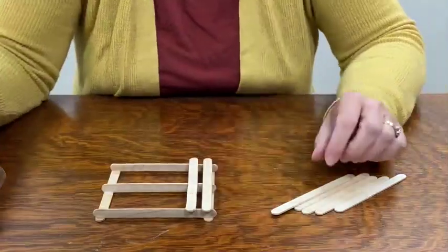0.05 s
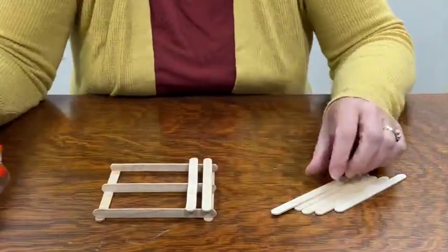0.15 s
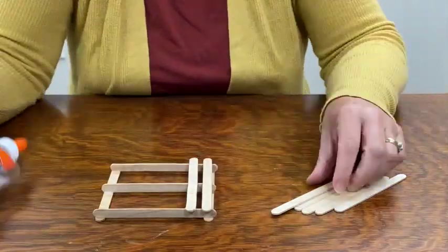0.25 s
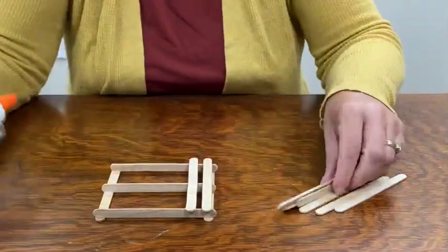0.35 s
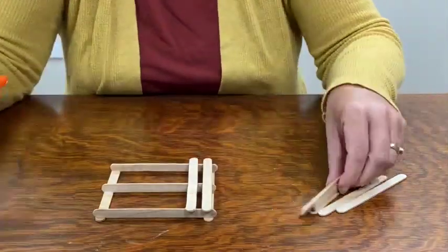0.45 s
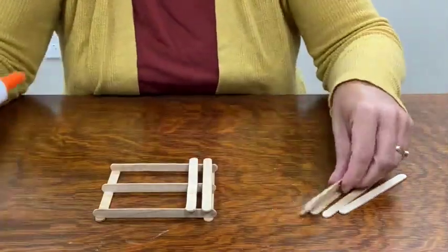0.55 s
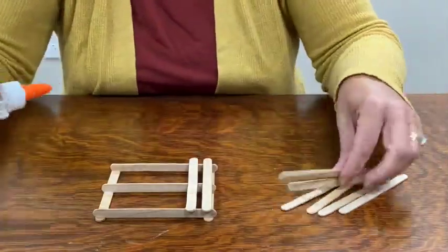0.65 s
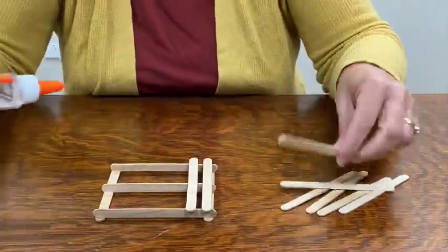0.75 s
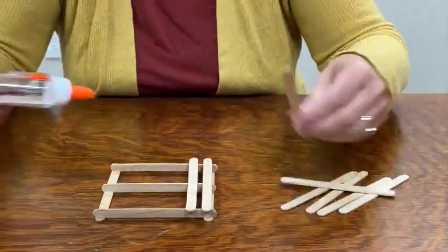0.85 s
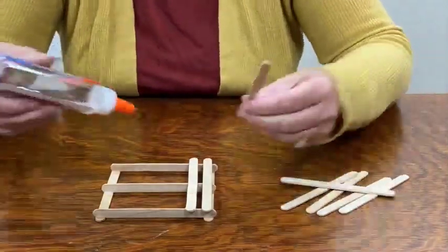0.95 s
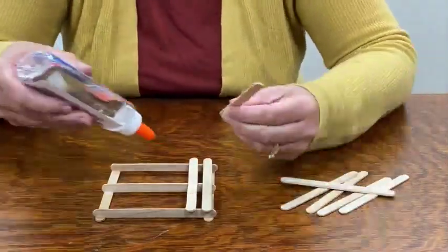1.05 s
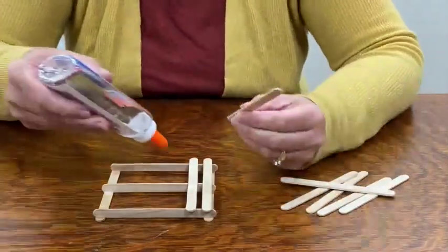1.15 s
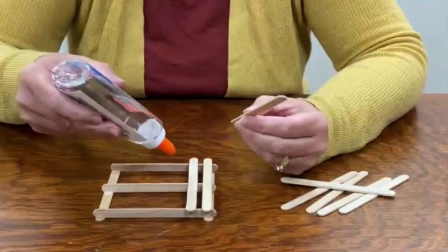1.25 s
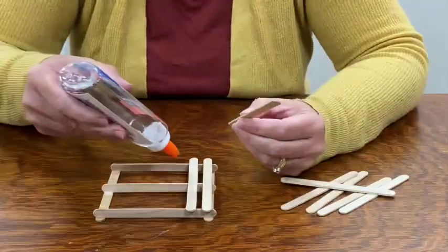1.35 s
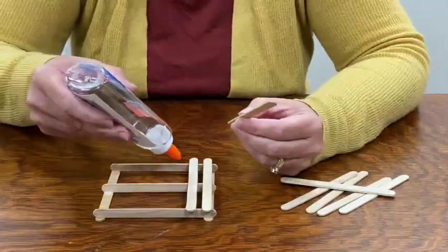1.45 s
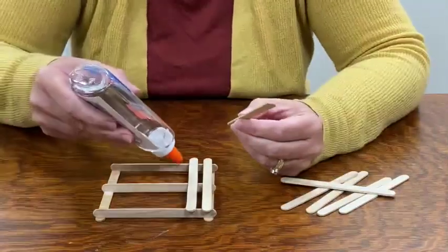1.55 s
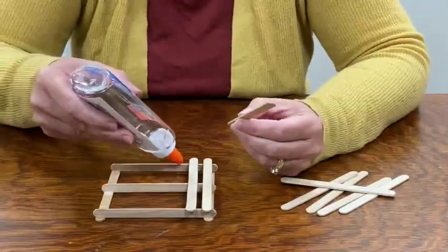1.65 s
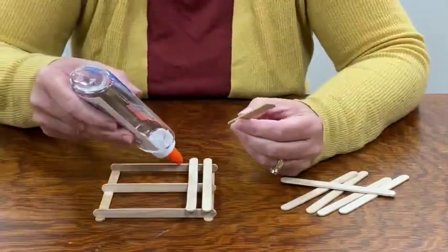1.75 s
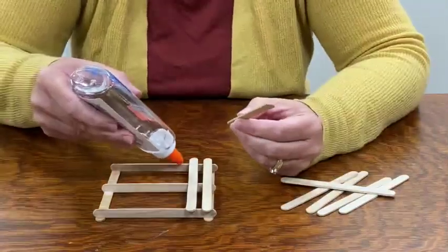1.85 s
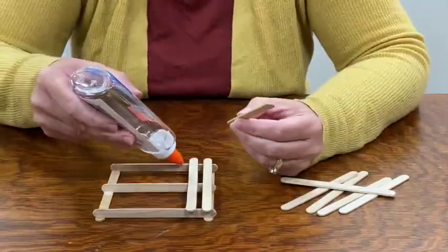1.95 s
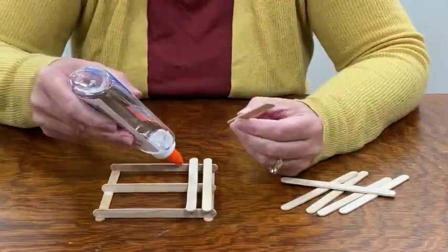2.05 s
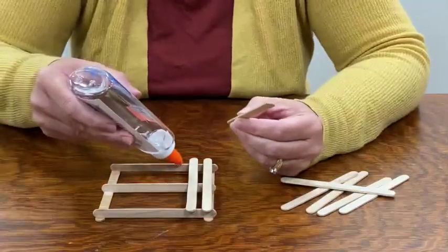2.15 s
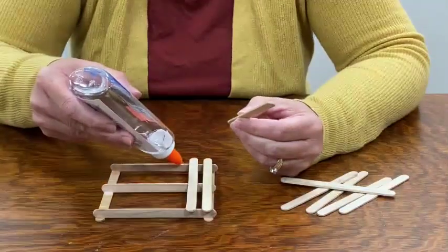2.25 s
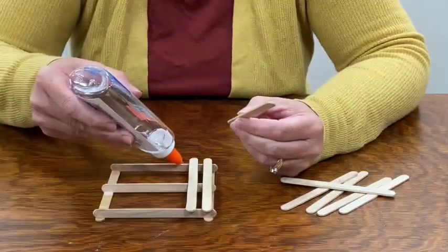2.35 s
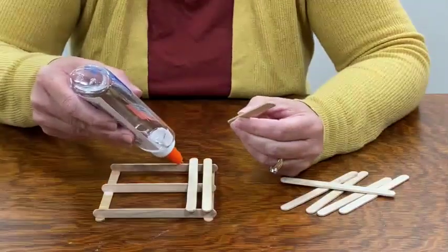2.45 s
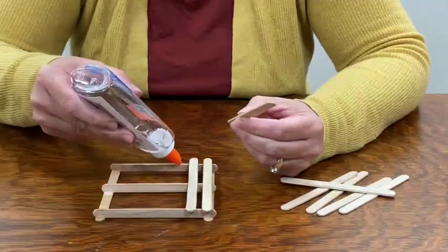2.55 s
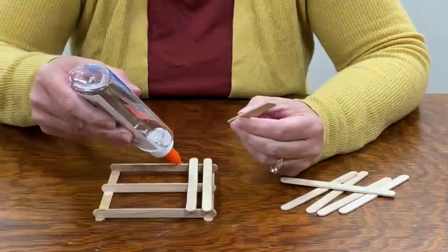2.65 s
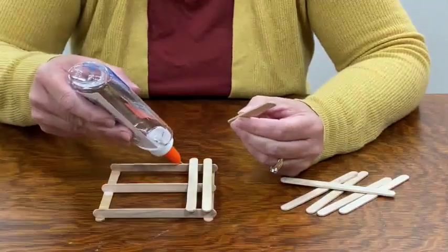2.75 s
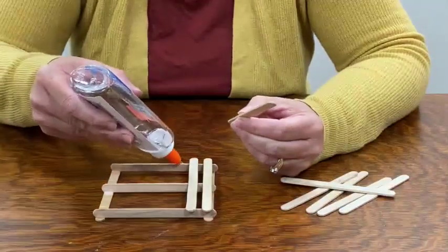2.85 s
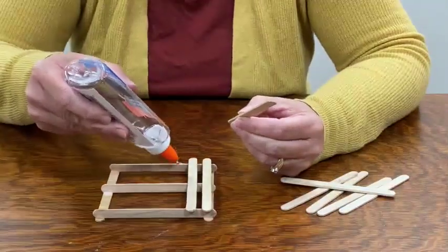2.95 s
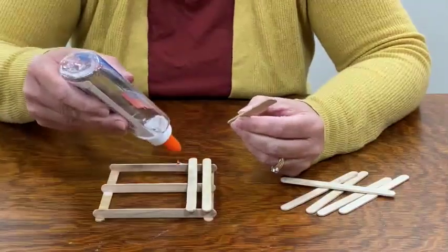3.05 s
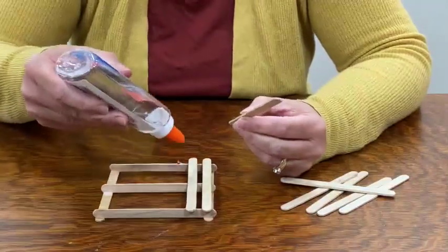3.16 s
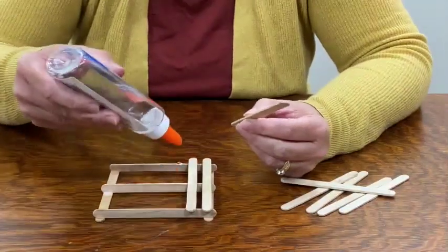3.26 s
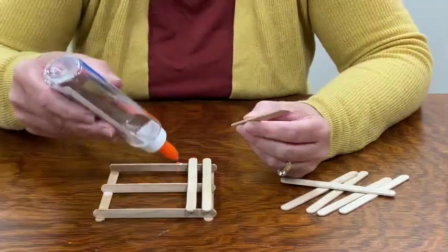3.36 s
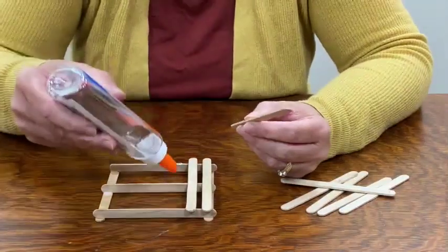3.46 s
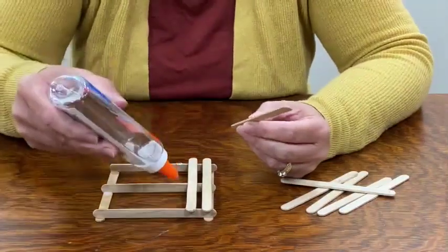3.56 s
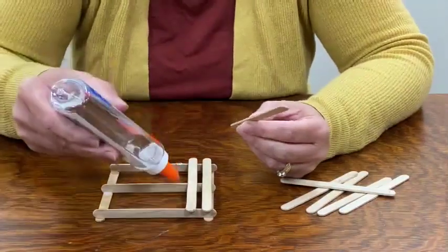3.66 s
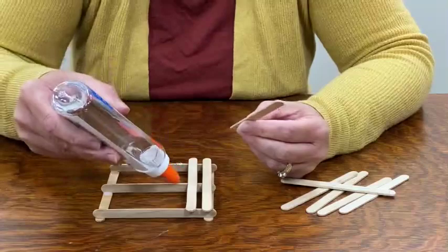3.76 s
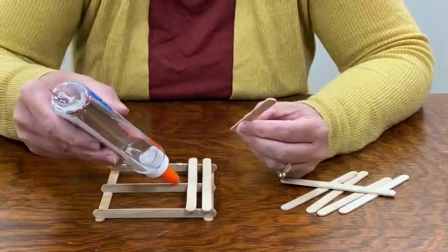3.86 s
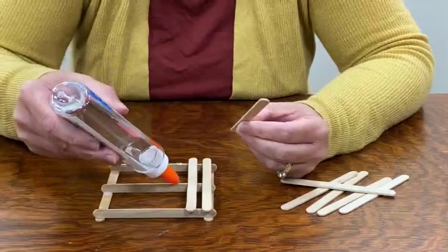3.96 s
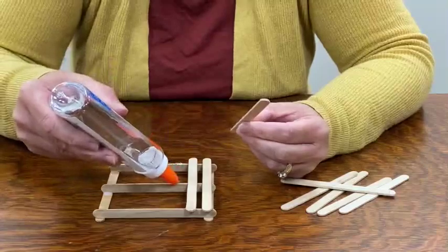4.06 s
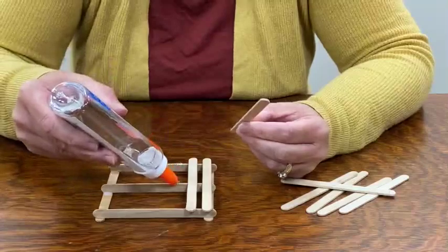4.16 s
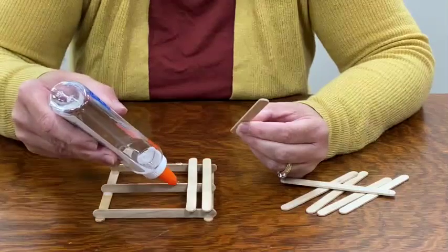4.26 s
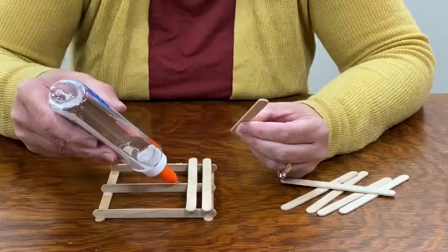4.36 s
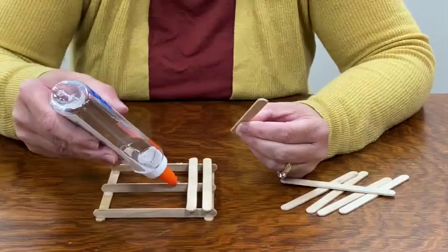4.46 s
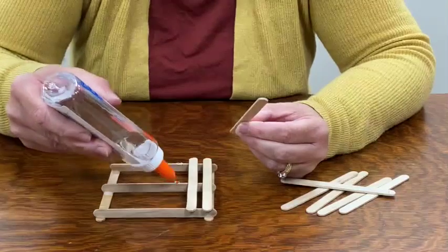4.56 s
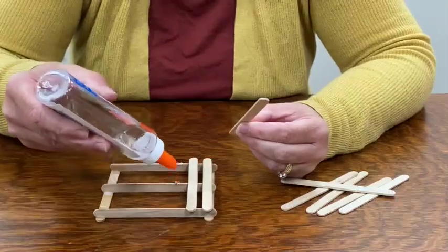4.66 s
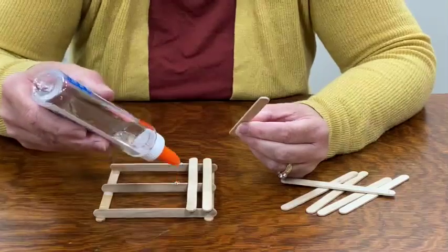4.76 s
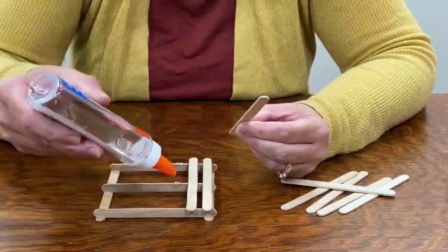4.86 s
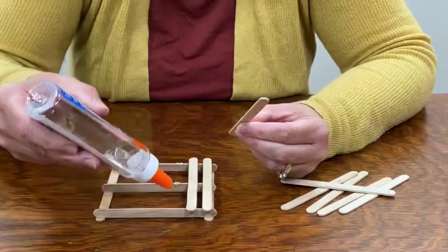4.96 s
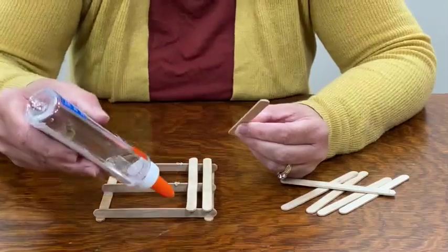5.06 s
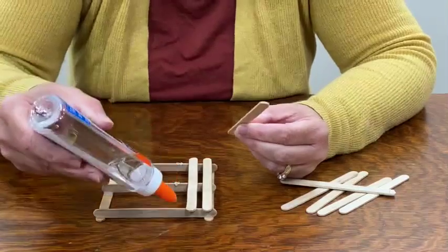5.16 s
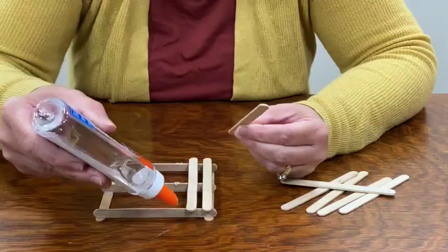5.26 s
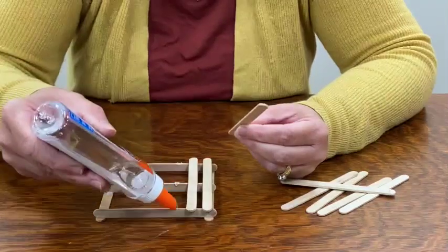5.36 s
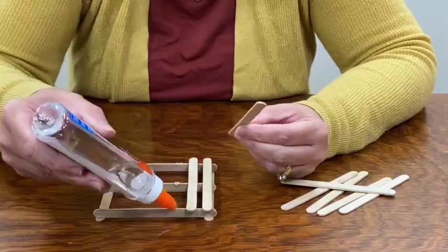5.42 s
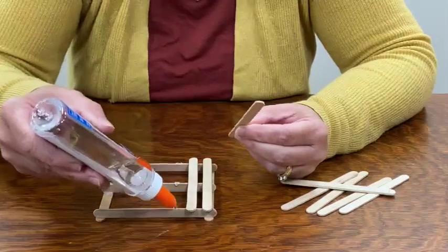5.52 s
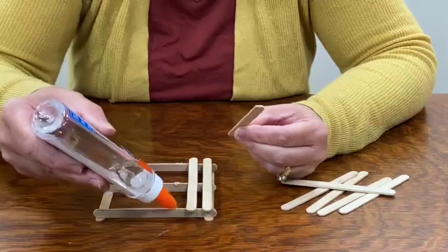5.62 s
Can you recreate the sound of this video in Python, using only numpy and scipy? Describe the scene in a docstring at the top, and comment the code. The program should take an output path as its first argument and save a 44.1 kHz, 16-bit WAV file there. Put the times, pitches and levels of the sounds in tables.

```python
"""A ventilation fan and mains hum fill a small, quiet room: shaped noise plus wavering tones.
Sleeves rustle as grained noise; a dull knock rings in a few low modes.
Thin wooden craft sticks are picked from a pile: cracks, rings and scrapes, coloured by shared modes.
Then a plastic glue bottle ticks faintly as it is handled: short snaps of band-shaped noise."""
import sys
import numpy as np
from scipy import signal
from scipy.fft import rfft, irfft, next_fast_len
from scipy.io import wavfile

SR = 44100
rng = np.random.default_rng(int(sys.argv[2]) if len(sys.argv) > 2 else 0)


def int16_out(signal):
    """Quantize to a 16-bit WAV file."""
    q = np.round(np.clip(np.atleast_2d(signal).T, -1, 1) * 32767)
    wavfile.write(sys.argv[1], SR, q.astype(np.int16))


N = 250929
TIME = np.arange(N) / SR
CUTOFF_HZ = 12400

# crack of dry thin wood: f/Hz, density/dB per Hz
WOOD_SPECTRUM = [(200, -3), (600, -4.5), (1400, -5.5), (2100, -8), (2700, -4), (3500, -5), (5000, -2.5),
                 (6100, -4.5), (7200, -0.5), (8300, 0.5), (9300, -1), (11200, -5.5), (12200, -18.5)]
# left-right likeness of the near sounds: f/Hz, likeness/0-1
NEAR_ALIKE = [(300, 0.45), (1200, 0.75), (3300, 1), (5500, 0.926), (12000, 0.99)]


def from_db(db):
    """Decibels to gain."""
    return 10 ** (np.asarray(db) / 20)


def rms_one(x):
    """Scale to rms 1."""
    return x / np.sqrt(np.mean(x ** 2) + 1e-20)


def at_hz(points, hz):
    """Read (Hz, value) points on a log-frequency axis."""
    known_hz, values = np.transpose(points)
    return np.interp(np.log(hz + 1), np.log(known_hz), values)


def drift(rate_hz):
    """Random wander: straight lines between normal knots of spread 1."""
    knots = rng.standard_normal(4096)
    return np.interp(TIME * rate_hz, np.arange(len(knots)), knots)


def noise(spectrum, likeness, tilt_db_per_octave=0, size=N):
    """Stereo noise of rms 1 with a spectrum, a tilt above 1500 Hz and a left-right likeness."""
    padded = next_fast_len(size, True)
    hz = np.arange(padded // 2 + 1) * SR / padded
    mid, side = rfft(rng.standard_normal((2, padded)))
    alike = np.clip(at_hz(likeness, hz), -1, 1)
    tilt_db = tilt_db_per_octave * np.log2(np.maximum(hz, 1500))
    gain = from_db(at_hz(spectrum, hz) + tilt_db) * (hz < CUTOFF_HZ)
    left_right = np.sqrt(1 + alike) * mid + np.sqrt(1 - alike) * side * [[1], [-1]]
    return rms_one(irfft(gain * left_right, padded)[:, :size])


def rising(rise_s, size):
    """Smooth onset from 0 towards 1."""
    return 1 - np.exp(-(TIME[:size] / rise_s) ** 2)


def dying(t60_s, size):
    """Exponential decay from 1."""
    return from_db(-60 * TIME[:size] / t60_s)


def ring(hz, t60_s, size):
    """One struck mode: a decaying sine."""
    return np.sin(2 * np.pi * hz * TIME[:size]) * dying(t60_s, size)


def add(out, s, sound):
    """Mix a sound into out at time s."""
    start = max(int(s * SR), 0)
    out[:, start:start + sound.shape[-1]] += sound[..., :N - start]


def stroke(peak_s, level_db, attack_s, release_s, range_db=20):
    """Gain of one hand movement: swells by range_db per attack, fades by range_db per release."""
    away = np.maximum((peak_s - TIME) / attack_s, (TIME - peak_s) / release_s)
    return from_db(level_db - range_db * away)


def ventilation(air_db=-45.5, deep_hz=88, deep_db=0.72, growth_db_per_s=0.65, wander_db=0.9):
    """Duct rumble and faint hiss with motor and mains tones; the deepest part grows slowly and wanders."""
    # rumble and hiss: f/Hz, density/dB per Hz
    air = [(15, -31.5), (27, -18), (38, -9), (52, -1.5), (70, -3.5), (105, 0.5), (125, -3.5), (139, 5),
           (155, 0.5), (180, -3.5), (230, -6), (280, -11.5), (340, -14.5), (385, -17), (420, -17.5),
           (480, -21.5), (560, -20.5), (700, -27.5), (1000, -32.5), (1500, -39), (2500, -44.5),
           (3500, -54.5), (5000, -59.5), (7000, -60), (9500, -66.5), (12000, -67)]
    # left-right likeness of the air noise: f/Hz, likeness/0-1
    air_alike = [(60, .985), (130, .91), (220, .7), (350, .6), (640, .52), (1200, .35), (2500, .15),
                 (3500, .45), (5000, .93), (12000, .9)]
    # mains hum and motor tones: f/Hz, rms level ahead of the deep gain/dB, waver/dB
    tones = [(57.7, -54.5, 0.5), (119.8, -45, 0), (137.2, -48.5, 5), (150.54, -48.5, 2),
             (239.9, -55, -0.98), (357, -70.5, 1)]
    out = from_db(air_db) * noise(air, air_alike)
    for hz, level_db, waver_db in tones:
        phase = 2 * np.pi * (hz * TIME + rng.random())
        peak = np.sqrt(2) * from_db(level_db + waver_db * drift(2.4))
        out = out + peak * np.sin(phase)
    lowpass = signal.butter(4, deep_hz, fs=SR, output="sos")
    deep = signal.sosfiltfilt(lowpass, out)
    surge_db = growth_db_per_s * (TIME - TIME.mean()) + wander_db * drift(1.6)
    return out + (from_db(deep_db + surge_db) - 1) * deep


def sleeves(grain_db=1.8):
    """Knitted wool brushes in a soft, fine-grained swish as the arms move."""
    # arm movements: peak t/s, level/dB, attack/s, release/s, brightness/dB per octave
    movements = [(.08, -68, .6, .22, -1), (.25, -66, .22, .21, 0.5), (.6, -71, .8, .3, 0.5),
                 (1.11, -74, .33, 0.23, 1.5), (1.22, -76, .25, 0.32, 2), (3.27, -83, .3, 0.18, 0.5),
                 (3.38, -81.5, .25, 0.18, 4.5), (4.92, -80.5, .55, .9, -0.5)]
    # f/Hz, density/dB per Hz
    cloth = [(400, -4), (1000, 8), (2000, 5), (3200, -1), (5000, -1), (7000, -2.5), (11000, -10),
             (12200, -16.5)]
    swish = np.zeros((2, N))
    for *movement, bright_db in movements:
        swish += stroke(*movement) * noise(cloth, NEAR_ALIKE, bright_db)
    return swish * from_db(grain_db * drift(300))


def knock(swell_s=0.0056, size=16384):
    """A soft, padded contact wakes only low modes, which swell over a few cycles."""
    # hollow knocks: t/s, level/dB
    hits = [(0.0861, -20.5), (.124, -38), (.134, -39)]
    # ring of each knock: f/Hz, level/dB, t60/s
    modes = [(429, -10, 0.08), (554, -13.5, 0.07), (593, 5.5, 0.031), (1114, -23.5, .025)]
    sound = rising(swell_s, size) * sum(from_db(db) * ring(hz, t60_s, size) for hz, db, t60_s in modes)
    out = np.zeros((2, N))
    for s, level_db in hits:
        add(out, s, from_db(level_db) * sound)
    return out


def pile(force, plain_db=-1, contact_db=1.4, width_hz=100):
    """Sticks pass on a broad crack and ring in shared modes, which vary as the point of contact shifts."""
    # bending modes of the pile: f/Hz, level/dB
    bending = [(2690, -7), (3020, -6), (3670, -2), (4450, -4), (4620, -7), (5090, -4), (5370, -7),
               (6960, -1.5), (7190, -0.5), (7520, -5), (11030, -0.5), (11420, -.5)]
    out = from_db(plain_db) * force
    for hz, db in bending:
        b, a = signal.iirpeak(hz, hz / width_hz, fs=SR)
        drive = force * from_db(db + contact_db * drift(50))
        out = out + signal.lfilter(b, a, drive + 1e-18)  # offset keeps off denormals
    return out


def stick_clicks(crack_db=3.0, crack_t60_s=0.016, rise_s=0.0003, size=4096):
    """Each contact is a short dry crack; the stick rings on until neighbours or fingers damp it."""
    # contacts: t/s, base level/dB, crack brightness/dB per octave, ring f/Hz, ring over base/dB, ring t60/s
    contacts = [(0.236, -47, 0, 5830, -5, 0.02), (0.3473, -56.5, 0, 5130, -9, 0.018),
                (0.3549, -52.5, -4, 3860, -5.5, 0.032), (.3905, -54, 0.5, 6960, -3.5, .015),
                (.4015, -45, 1, 7000, -2.5, .015), (0.4071, -33, 3.5, 7040, 2.5, 0.02),
                (0.4092, -30.5, 4.5, 4640, -2, 0.02), (0.4124, -30, 0, 2695, -4.5, 0.015),
                (0.4136, -27, 3.5, 7100, 0, .016), (0.415, -26.5, 3.5, 5050, 5, 0.012),
                (0.416, -25, 3, 11070, 8.5, .007), (0.428, -42, 2, 5330, 0.5, .008),
                (0.4362, -35, 1, 7100, -1, .02), (0.4379, -39, -1.5, 3930, -2, 0.028),
                (0.4416, -45, -2, 2780, -4, .015), (0.449, -46.5, -1, 3480, -0.5, .025),
                (0.4665, -52, 1, 4600, -4.5, 0.018), (0.5758, -63, -5, 3730, 6, .025),
                (.627, -57, -0.5, 7100, 2, .02), (0.6388, -51.5, -2, 4420, 3.5, 0.023),
                (0.6508, -48, 0, 4450, 5, .022), (0.6528, -59, 1, 5370, -1.5, 0.025),
                (0.6652, -49, -1, 3650, 1, .02), (0.6736, -37, -1.5, 7700, 5.5, 0.013),
                (0.7051, -44.5, -2, 3640, 9, 0.032), (0.712, -49, -4, 4700, -3, .02),
                (0.7187, -43.5, -5, 3640, -1, .018), (0.7349, -32.5, -0.5, 5640, -6.5, 0.012),
                (0.7418, -39, -1, 10500, -1, .015), (0.7617, -41.5, 8, 11360, 2, 0.022),
                (0.7732, -37.5, 1.5, 11340, 3, 0.013), (0.779, -38, 2, 4480, -3, 0.017),
                (0.7802, -40, -2, 10940, 7, 0.025), (0.783, -43.5, 3, 7210, 3.5, .024),
                (0.7911, -46, 2, 10160, 10, 0.022), (0.8006, -55, 0, 7160, 0, .015)]
    cracks, rings = np.zeros((2, 2, N))
    onset = rising(rise_s, size)
    for s, level_db, bright_db, hz, ring_db, t60_s in contacts:
        crack = noise(WOOD_SPECTRUM, NEAR_ALIKE, bright_db, size=size) * dying(crack_t60_s, size)
        add(cracks, s, from_db(level_db + crack_db) * crack * onset)
        add(rings, s, from_db(level_db + ring_db) * ring(hz, t60_s, size) * onset)
    return pile(cracks) + rings


def stick_slide(grain_db=4.5, grains_per_s=800, skips_per_s=260, skip_db=-7, skip_t60_s=0.005, size=512):
    """Wood grain catches unevenly as the sticks slide, and their edges skip in tiny contacts."""
    # one is prised up, the pile settles, it is drawn out and slips free:
    # peak t/s, level ahead of grain and pile/dB, attack/s, release/s, brightness/dB per octave
    slides = [(.414, -40, 0.023, 0.0023, 1), (.438, -52.5, 0.023, 0.044, -.5),
              (.658, -57.5, 0.12, 0.2, -1.5), (.785, -56.5, 0.25, 0.037, -0.5)]
    catches = rms_one(from_db(grain_db * drift(grains_per_s)))
    hits = (rng.random(N) < skips_per_s / SR) * rng.uniform(.5, 1, N)
    skips = rms_one(signal.fftconvolve(hits, dying(skip_t60_s, size))[:N])
    rubs = np.zeros((2, N))
    for *slide, bright_db in slides:
        rubs += stroke(*slide) * noise(WOOD_SPECTRUM, NEAR_ALIKE, bright_db)
    return pile(rms_one(catches + from_db(skip_db) * skips) * rubs)


def bottle_ticks(rise_share=0.06, size=16384):
    """Damped plastic snaps and creaks, each in its own band plus a crisp edge; long ones start softer."""
    # t/s, level/dB, band from f/Hz, band to f/Hz, t60/s, crisp edge against band/dB
    ticks = [(1.195, -63, 3200, 4900, 0.028, -12), (1.368, -68, 2100, 3700, .14, -25),
             (2.648, -74, 4450, 4750, .024, -18), (2.889, -70, 4400, 4750, .024, -4.5),
             (3.25, -76, 3590, 6000, .03, -20.5), (3.24, -75, 2450, 2750, 0.51, -30),
             (3.738, -81.5, 4000, 4990, 0.038, 6.5), (4.46, -53.5, 1050, 2250, .026, -25.5),
             (4.583, -68, 2850, 3100, .022, -25), (4.582, -68, 3750, 4180, .03, -22.5),
             (4.708, -57, 1950, 3600, 0.022, -12), (4.94, -74, 3850, 4150, .06, -22),
             (5.245, -83.5, 3990, 4990, 0.041, 6.5)]
    # crisp edge of a snap: f/Hz, density/dB per Hz
    crisp = [(5000, -23), (8000, 1.5), (11500, 0), (12400, -16)]
    out = np.zeros((2, N))
    for s, level_db, low_hz, high_hz, t60_s, crisp_db in ticks:
        fall_db = 7 * np.log2(low_hz / high_hz)  # 7 dB per octave down across the band
        band = [(low_hz / 3, -30), (low_hz / 1.2, -18), (low_hz, 0),
                (high_hz, fall_db), (high_hz * 1.15, -28), (high_hz * 2, -50)]
        snap = noise(band, NEAR_ALIKE, size=size)
        snap = snap + from_db(crisp_db) * noise(crisp, NEAR_ALIKE, size=size)
        envelope = rising(rise_share * t60_s, size) * dying(t60_s, size)
        envelope_rms = np.sqrt(np.mean(envelope ** 2))
        add(out, s, from_db(level_db) * rms_one(snap * envelope) * envelope_rms)
    return out


def room(x, t60_s=0.25, build_s=0.006, size=22050):
    """Diffuse reflections that build up over some milliseconds and die away."""
    walls = [(300, 15.5), (1500, 6.5), (4000, -0.5), (7000, -4.0), (12000, -7.0)]  # f/Hz, dB per Hz
    alike = [(200, 1.0), (1200, 0.72), (3500, 1.0), (12000, 1.0)]  # f/Hz, likeness/0-1
    tail = noise(walls, alike, size=size) * dying(t60_s, size) * rising(build_s, size)
    tail = tail / np.sqrt(np.sum(tail ** 2) / 2)  # mean energy 1 per channel
    return signal.fftconvolve(x, tail, axes=1)[:, :N]


def scene(room_db=-9, knock_room_db=-22):
    """Handling sounds and the knock, their reflections, and the room's own hum."""
    hum = ventilation()
    thud = knock()
    handling = sleeves() + stick_clicks() + stick_slide() + bottle_ticks()
    reflections = room(from_db(room_db) * handling + from_db(knock_room_db) * thud)
    return hum + handling + thud + reflections


def record(dry, size=4096):
    """Two microphone ports fall out of step in the high treble, which widens the clicks; the top is cut."""
    # f/Hz, right lag/rad
    port_phase = [(6850, 0), (7320, 1.7), (8300, 3.1), (9800, 3.3), (10700, 5), (11100, 5.9), (12400, 5.6)]
    right = np.pad(dry[1], size, "reflect", reflect_type="odd")
    lag = at_hz(port_phase, np.fft.rfftfreq(len(right), 1 / SR))
    right = irfft(rfft(right) * np.exp(-1j * lag), len(right))[size:-size]
    lowpass = signal.cheby2(14, 70, CUTOFF_HZ + 900, fs=SR, output="sos")
    return signal.sosfilt(lowpass, [dry[0], right])


dry = scene()
out = record(dry)
int16_out(out)
```